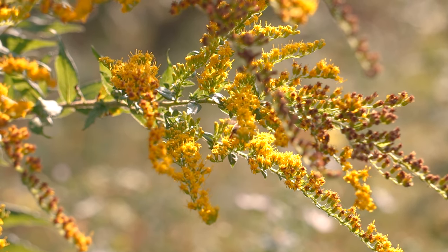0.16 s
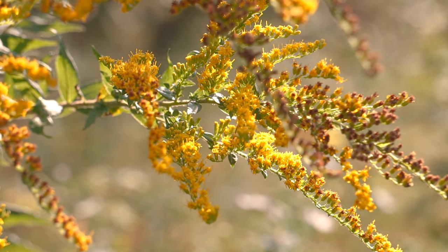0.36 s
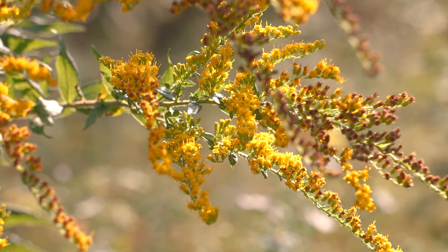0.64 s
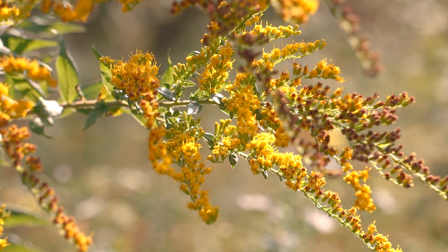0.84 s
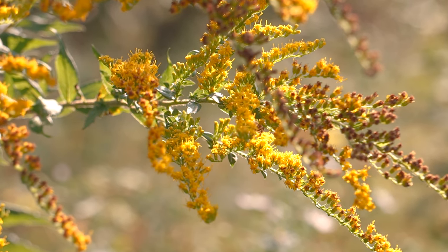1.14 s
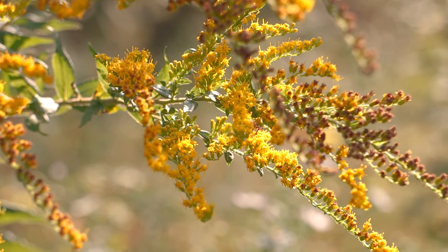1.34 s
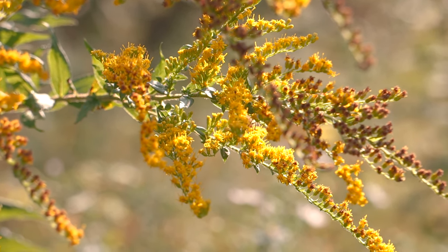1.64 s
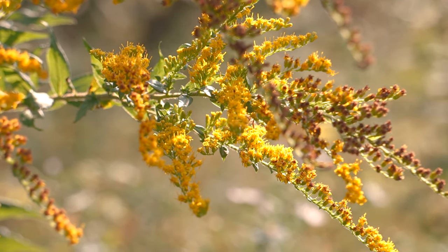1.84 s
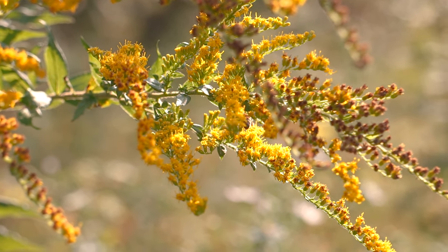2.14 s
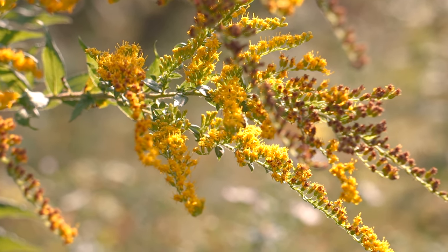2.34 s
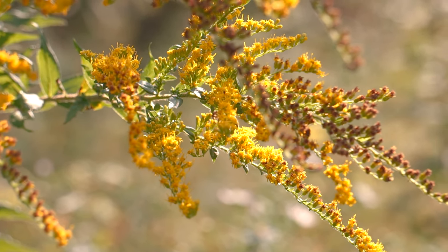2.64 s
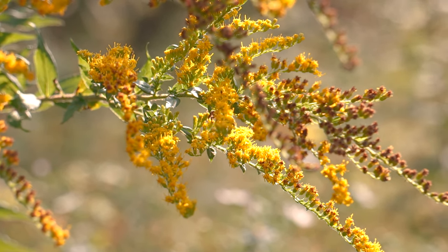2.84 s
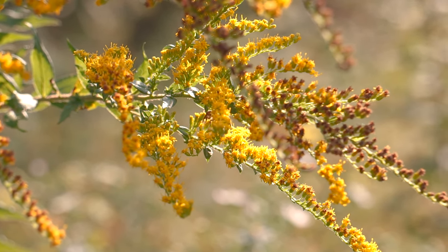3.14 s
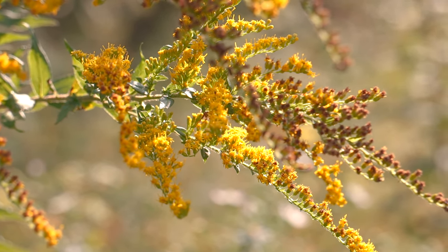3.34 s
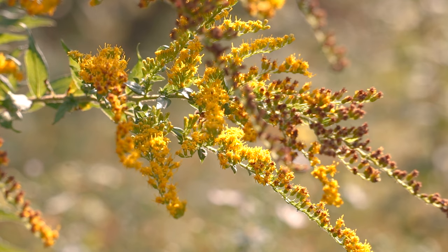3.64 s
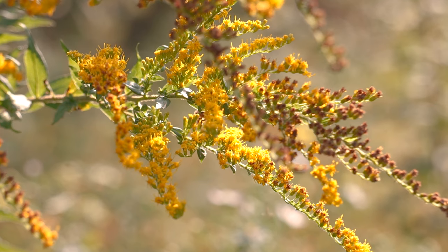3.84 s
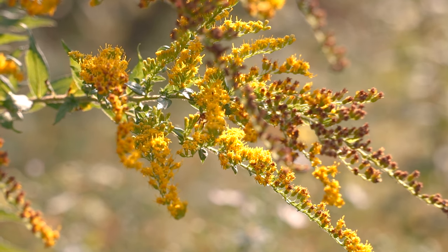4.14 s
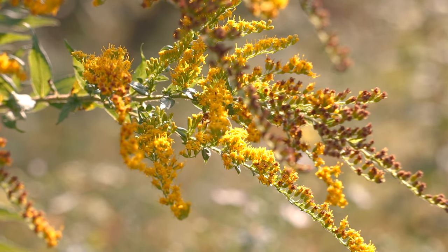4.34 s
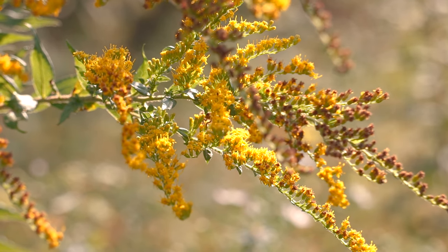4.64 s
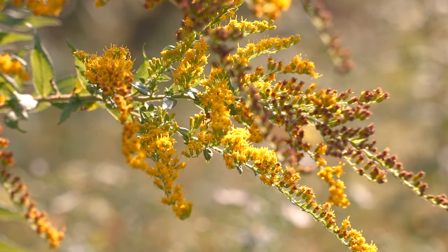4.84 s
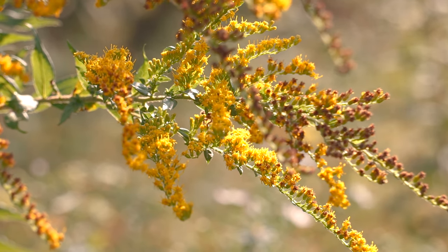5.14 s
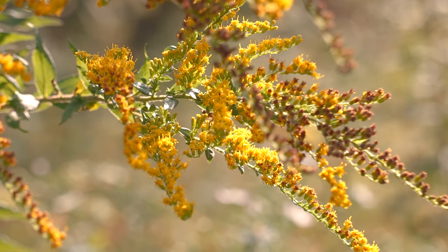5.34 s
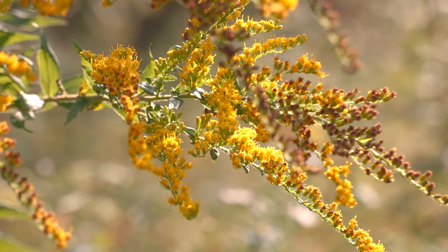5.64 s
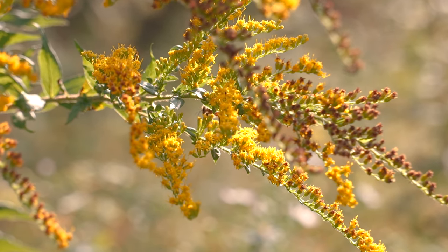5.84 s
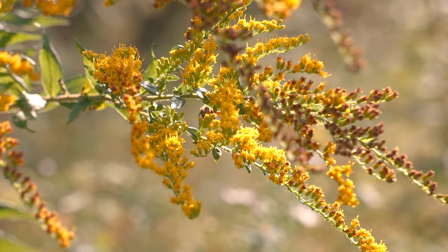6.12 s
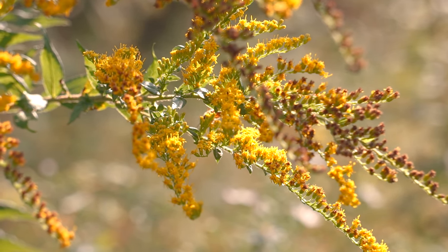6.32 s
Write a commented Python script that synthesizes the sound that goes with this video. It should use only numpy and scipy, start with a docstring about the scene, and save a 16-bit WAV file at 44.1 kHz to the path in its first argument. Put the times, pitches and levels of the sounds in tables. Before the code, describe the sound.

A cricket trills steadily close on the left over a high chorus of meadow insects, with a few ticks and one sharp click.

```python
"""A tree cricket trills close on the left in a sunny meadow, heard by two close microphone ports.
Each wing stroke draws a scraper along a file: a short tone that swells and sinks in pitch.
Other tree crickets, ground crickets and raspy katydids sing further off. A nearby katydid scrapes
two short runs of ticks, the second loud, then a few faint single ones. Behind them lie the blurred
chorus of the field, a wash of air, faint far calls, a whine and a hum."""
import sys
import numpy as np
from scipy import signal
from scipy.io import wavfile
from scipy.ndimage import uniform_filter1d

SR = 44100
rng = np.random.default_rng(int(sys.argv[2]) if len(sys.argv) > 2 else 0)


def wav_out(sig):
    """Save sig, one row per channel (or a flat mono array), as 16-bit PCM at SR to the path in sys.argv[1]."""
    wavfile.write(sys.argv[1], SR, np.round(np.clip(np.atleast_2d(sig).T, -1, 1) * 32767).astype(np.int16))


N = 285768
TIME = np.arange(N) / SR


def soloists():
    """The near tree cricket and the other insects that stand out of the chorus, each from its side."""
    # one voice a row, the near cricket first: (wing pitch [Hz], fall per stroke [Hz],
    # sounding share of the beat [0-1], rasp [0-1], rasp width [Hz], phase drift per stroke [turns],
    # unevenness [dB], left [dB], right [dB], right phase lead [rad])
    voices = [(4318, 170, .53, .006, 150, .18, .4, -17.2, -34, -2.3),
              (4140, 230, .62, .08, 150, .3, 1, -40, -31, -2.4),
              (8500, 440, .4, .15, 200, .4, 1.5, -34, -24.7, -1.7),
              (4765, 150, .62, .03, 150, .22, .8, -31.5, -31.5, -2.0),
              (5520, 80, .55, .4, 200, .4, 2, -39, -46, 3.0), (5500, 80, .6, .6, 200, .5, 5, -46, -37, 3.0),
              (12980, 60, .5, .5, 200, .4, 2, -48, -63, .3),
              (14800, 30, .2, .95, 2200, .5, 2, -60, -48, .3),
              (15300, 30, .17, .95, 1800, .5, 2, -49, -62, .3)]
    # each voice's steady tempo: (rate [strokes/s])
    tempos = [54.25, 53.15, 19.3, 69.42, 71.65, 28.25, 60, 45.02, 48.2]
    # its slow sway: (mean lead [strokes], sway [strokes], period [s], moment furthest ahead [s])
    sways = [(-.305, .05, 4.8, 1.6), (.48, .02, 3, 2), (.41, .22, 7.5, 2.9), (.33, .1, 3.9, 4.2),
             (-.15, .2, 5, 4.6), (-.3, .25, 6, 5), (0, .1, 4, 1), (.5, .03, 3, 3), (-.05, .12, 5, 2.7)]
    # the near cricket's slight crescendo: (time [s], level [dB])
    crescendo = [(0.0, 0), (6.48, 1)]
    third_harmonic_db, ground_echo_s, ground_echo_db = -35, .006, -12
    out = np.zeros((2, N))
    for k, (voice, rate, (lead, sway, period, furthest)) in enumerate(zip(voices, tempos, sways)):
        *wing, left_db, right_db, right_lead = voice
        ahead = lead + sway * np.cos(2 * np.pi * (TIME - furthest) / period)
        envelope, phase = trill(rate, ahead, *wing)
        song = envelope * np.exp(1j * phase)
        if k == 0:
            song += gain_of(third_harmonic_db) * envelope * np.exp(3j * phase)
            song += gain_of(ground_echo_db) * np.roll(song, round(ground_echo_s * SR))
            song *= gain_of(curves(crescendo)[0])
        out[0] += gain_of(left_db) * song.real
        out[1] += gain_of(right_db) * (song * np.exp(1j * right_lead)).real
    return out


def trill(rate, ahead, hz, fall_hz, share, rasp, rasp_hz, drift, uneven_db):
    """Each wing stroke swells, sinks in pitch and stops short; returns envelope and phase."""
    beat = rate * TIME + ahead + .66 * share + 2  # loudest near the whole beat
    stroke = beat.astype(int)
    along = (beat - stroke) / share
    slip, force = rng.standard_normal((stroke.max() + 1, 2)).T
    swell = np.sin(np.pi * np.clip(along, 0, 1) ** 2.37) ** .53
    swell *= gain_of(uneven_db * force)[stroke]
    swell = uniform_filter1d(swell, size=45)  # the wing rings up and down in about a millisecond
    # the scraper starts afresh each stroke and slows along the file
    turns = share / rate * (hz * along - fall_hz * along ** 2 / 2) + drift * np.cumsum(slip)[stroke]
    grain = np.sqrt(1 - rasp) + np.sqrt(rasp) * flutter(rasp_hz)
    return swell * grain, 2 * np.pi * turns


def katydid():
    """Uneven file teeth click into the wing's short modes; the leaves throw back a brief tail."""
    # wing scrapes: (time [s], force [dB], left minus right [dB])
    scrapes = [(.918, -47, 0), (.940, -41, 4), (.9635, -34.5, 3), (1.7145, -41, 0), (1.7375, -36, -3),
               (1.760, -33, -1), (1.7875, -21.5, 1.5), (3.277, -45, 0), (3.999, -45, 0), (5.25, -46, 0),
               (5.801, -45, 0), (6.285, -46, 0)]
    # wing resonances, lowest first: (pitch [Hz], width [Hz], left [dB], right [dB])
    wing_modes = [(10650, 700, -1, -11), (11970, 570, 3, 2), (12860, 600, 2, -8), (14300, 1100, -9, 6.5),
                  (15600, 700, -9, -11)]
    full_db, full_s, teeth_per_s = -21.5, .016, 3000
    push, low_push = np.zeros((2, 2, N))
    for start, db, pan_db in scrapes:
        # a harder scrape lasts longer and sets the two lowest modes ringing more
        along = (TIME - start) / (full_s + .00015 * (db - full_db))
        envelope = np.clip(np.minimum(along / .5, (1.05 - along) / .15), 0, 1)
        stroke = gain_of([[db + pan_db / 2], [db - pan_db / 2]]) * envelope
        push += stroke
        low_push += stroke * gain_of(.7 * (db - full_db))
    jitter = unit_rms(uniform_filter1d(rng.standard_normal(N), size=20))
    teeth_passed = np.cumsum(teeth_per_s * (1 + .35 * jitter)) / SR
    clicks = (np.diff(np.floor(teeth_passed), prepend=0) > 0) * gain_of(1.6 * rng.standard_normal(N))
    t = np.arange(200) / SR
    rings = [gain_of([[left_db], [right_db]]) * np.exp(-np.pi * width * t) * np.sin(2 * np.pi * hz * t)
             for hz, width, left_db, right_db in wing_modes]
    low_ring = signal.oaconvolve(low_push * clicks, sum(rings[:2]), axes=1)
    high_ring = signal.oaconvolve(push * clicks, sum(rings[2:]), axes=1)
    ticks = off_leaves((low_ring + high_ring)[:, :N])
    # a wing this small radiates no low tones
    return signal.sosfilt(signal.butter(6, 9200, "high", fs=SR, output="sos"), ticks)


def off_leaves(direct, wet_db=-5):
    """Adds the scatter from the leaves: a quick splash and a fainter, longer tail."""
    t = np.arange(9000) / SR
    decay = gain_of(-60 * t / .1) + gain_of(-16 - 60 * t / .53)
    tail = rng.standard_normal((2, len(t))) * decay * (t > .002)
    tail /= np.linalg.norm(tail[0])
    return direct + gain_of(wet_db) * signal.oaconvolve(direct, tail, axes=1)[:, :N]


def ground_crickets(count):
    """Unsynchronised trills at middle distance on both sides; the highest are faintest."""
    # the group: (lowest [Hz], highest [Hz], slowest [strokes/s], fastest [strokes/s], base level [dB])
    group = (7905, 9199, 17, 21, -37)
    low_hz, high_hz, slow, fast, base_db = group
    out = np.zeros((2, N))
    for k, (pace, ahead) in enumerate(rng.random((count, 2))):
        height = k / (count - 1)
        envelope, phase = trill(slow + pace * (fast - slow), ahead, low_hz + height * (high_hz - low_hz),
                                fall_hz=400, share=.4, rasp=.55, rasp_hz=250, drift=.5, uneven_db=2)
        song = gain_of(base_db - 6.4 * abs(height - .35)) * envelope * np.exp(1j * phase)
        side_db = 3 * (-1) ** k
        out += [gain_of(side_db) * song.real, gain_of(-side_db) * (song * np.exp(-1.7j)).real]
    return out


def chorus_and_air():
    """Countless far insects blur into two bands over a wash of air."""
    # spectra of the three beds: (frequency [Hz], left [dB/Hz], right [dB/Hz],
    # left-right likeness [0-1], right phase lead [rad])
    low_chorus = [(1500, -125, -125, .3, 4), (3300, -92, -92, .3, 4), (3700, -78, -78, .4, 4),
                  (3950, -71, -65, .5, 3.9), (4200, -64, -62, .5, 4), (4450, -69, -71, .5, 4),
                  (4670, -64, -64, .7, 4.2), (4950, -69, -68, .3, 3.6), (5500, -70, -68, .5, 3.1),
                  (5750, -76, -76, .3, 3.1), (5950, -84, -85, .2, 3), (6250, -93, -95, .2, 3)]
    high_chorus = [(5000, -130, -130, .2, 2.7), (6100, -100, -108, 0.18, 2.7), (7260, -76, -84, 0.32, 2.6),
                   (7800, -68, -66.5, 0.64, 4.3), (8310, -62, -63, 0.35, 4.76),
                   (8564, -70, -65.5, 0.68, 4.4), (9030, -71.5, -75.5, 0.55, 4.75),
                   (9140, -76, -95, .3, 3.5), (9300, -100, -100, .2, 3)]
    air = [(25, -94, -94, .95, 0), (90, -94, -94, .9, .1), (154, -86.5, -87, .78, .5),
           (302, -77.5, -78.5, .66, 1.7), (640, -73.5, -76, .7, 2.4), (1100, -76, -79, .58, 2.4),
           (2700, -80, -82.5, .2, 2.2), (6500, -94, -83.5, .1, 2.9), (10100, -92, -92.5, .2, 5.7),
           (10300, -84.5, -88.5, .2, 5.8), (13900, -89, -91, .2, 5.9), (16000, -84, -82.5, .2, 4.9)]
    # slow gain rides on top: (time [s], low chorus [dB], high chorus [dB], air [dB])
    rides = [(0, 3, -1, 0.5), (1.4, 2, 0, 0), (2.8, 1.5, 0.5, 0), (4.2, 2.5, -1.5, 1), (5.4, 3, 0, .7),
             (6.48, 2.5, 0.1, 0.5)]
    low_db, high_db, air_db = curves(rides)
    chorus = noise_bed(low_chorus, low_db, patchy_db=1.52) + noise_bed(high_chorus, high_db, patchy_db=.5)
    return chorus + noise_bed(air, air_db, patchy_db=1.5)


def noise_bed(spectrum, ride_db, patchy_db):
    """Shaped hiss with drifting patches; the right port shares a phase-shifted part of the left."""
    hz, frames = np.fft.rfftfreq(1024, 1 / SR), N // 256 + 5
    knots_hz, *columns = np.transpose(spectrum)
    left_db, right_db, likeness, lead = (
        np.interp(np.log(hz + 1), np.log(knots_hz + 1), column)[:, None] for column in columns)
    a, b, c, d, patches = rng.standard_normal((frames, len(hz), 5)).T
    patches = unit_rms(uniform_filter1d(uniform_filter1d(patches, size=8, axis=0), size=8, axis=1))
    left, unshared = a + 1j * b, c + 1j * d
    right = likeness * np.exp(1j * lead) * left + np.sqrt(1 - likeness ** 2) * unshared
    spectra = np.array([left, right]) * gain_of(np.array([left_db, right_db]) + patchy_db * patches)
    hiss = signal.istft(spectra, nperseg=1024, noverlap=768)[1][:, :N]
    left_power = np.sum(gain_of(left_db) ** 2) * hz[1]
    return hiss * np.sqrt(left_power / np.mean(hiss[0] ** 2)) * gain_of(ride_db)


def far_calls():
    """Short fuzzy tones that swell and fade in the distance."""
    # faint calls: (time [s], length [s], pitch [Hz], width [Hz], left [dB], right [dB])
    calls = [(0, .45, 310, 190, -51, -54), (.9, .3, 330, 150, -53, -54), (.69, .12, 2220, 22, -53, -48),
             (.76, .16, 1700, 40, -57, -57), (2.38, .14, 2200, 30, -56, -56)]
    out = np.zeros((2, N))
    for start, length, hz, width, left_db, right_db in calls:
        swell = np.sin(np.pi * np.clip((TIME - start) / length, 0, 1))
        out += gain_of([[left_db], [right_db]]) * swell * tone(hz, flutter(width))
    return out


def whine():
    """A faint fuzzy tone to the left that rises quickly in bouts and fades through each."""
    # bouts of whining: (time [s], length [s], level before fade and pan [dB])
    bouts = [(.06, 0.94, -56.5), (2.15, 0.94, -55.5), (4.2, 0.62, -61), (4.852, 0.48, -58), (5.4, .3, -53),
             (5.816, 0.13, -53)]
    edge_s, fade_db, rest_db = .06, -9.5, -67
    level = np.full(N, gain_of(rest_db))
    for start, length, db in bouts:
        since = TIME - start
        edges = np.clip(np.minimum(since, length - since) / edge_s, 0, 1)
        level += edges * gain_of(db + fade_db * np.clip(since / length, 0, 1))
    return level * gain_of([[4], [-3]]) * tone(hz=1443, envelope=flutter(width_hz=90))


def hum():
    """A faint, low, wavering tone in the centre."""
    return gain_of(-68.5) * tone(hz=173, envelope=1 + .53 * flutter(width_hz=18))


def tone(hz, envelope):
    """A sine whose level and phase follow a complex envelope."""
    return (envelope * np.exp(2j * np.pi * hz * TIME)).real


def flutter(width_hz):
    """Complex noise that wanders within a given bandwidth."""
    pole = np.exp(-np.pi * width_hz / SR)
    real, imag = rng.standard_normal((2, N))
    return unit_rms(signal.lfilter([1], [1, -2 * pole, pole * pole], real + 1j * imag))


def curves(rows):
    """Joins timed rows by straight lines, one curve for each value column."""
    times, *columns = np.transpose(rows)
    return [np.interp(TIME, times, column) for column in columns]


def gain_of(db):
    """Decibels to gain."""
    return 10 ** (np.asarray(db) / 20)


def unit_rms(x):
    """Scales to rms 1."""
    return x / np.sqrt(np.mean(abs(x) ** 2) + 1e-20)


def scene():
    """The whole meadow at the two ports."""
    return soloists() + ground_crickets(count=6) + chorus_and_air() + hum() + whine() + far_calls() + katydid()


def record(dry):
    """The microphone's bass cut and a steep band limit on the treble."""
    bass_cut_hz, band_limit_hz = 70, 15800
    thinned = signal.sosfilt(signal.butter(2, bass_cut_hz, "high", fs=SR, output="sos"), dry)
    lowpass = signal.firwin(1023, band_limit_hz, window=("kaiser", 9), fs=SR)
    return signal.oaconvolve(thinned, lowpass[None], "same")


dry = scene()
out = record(dry)
wav_out(out)
```